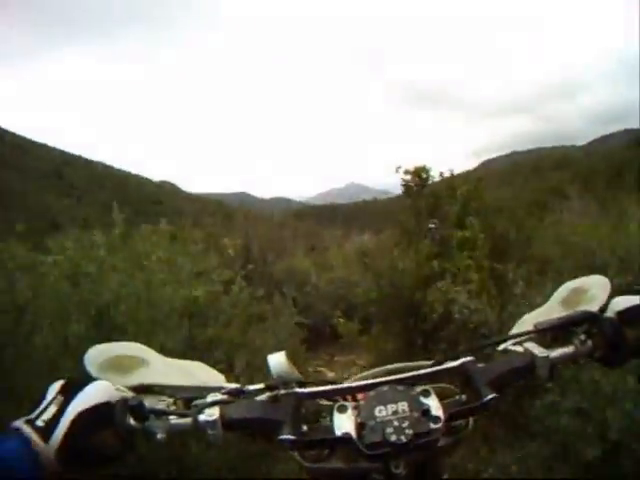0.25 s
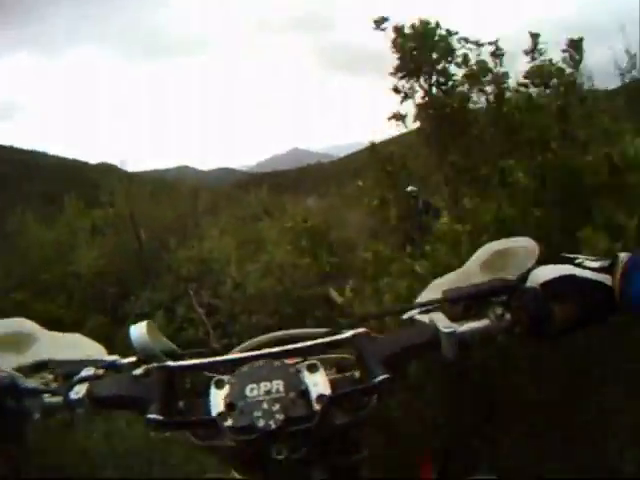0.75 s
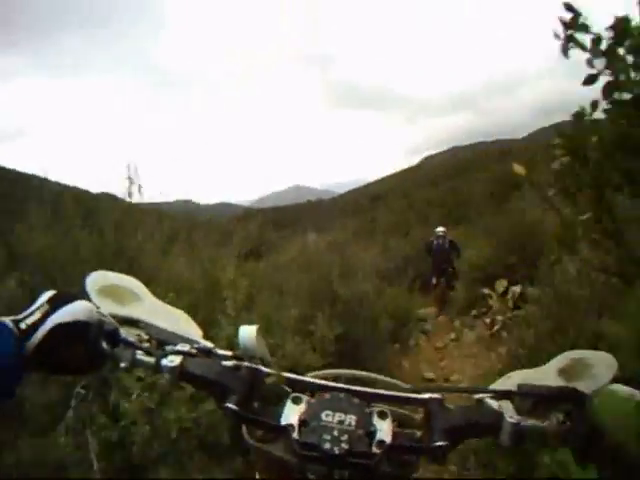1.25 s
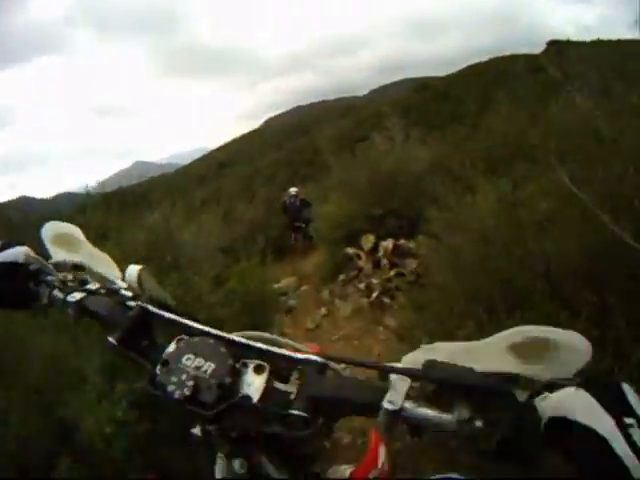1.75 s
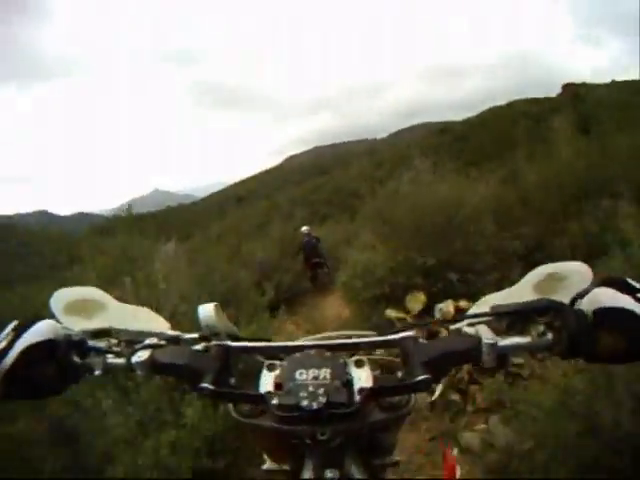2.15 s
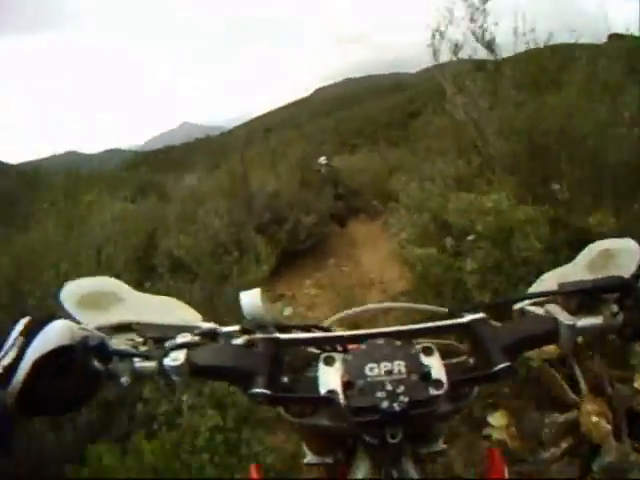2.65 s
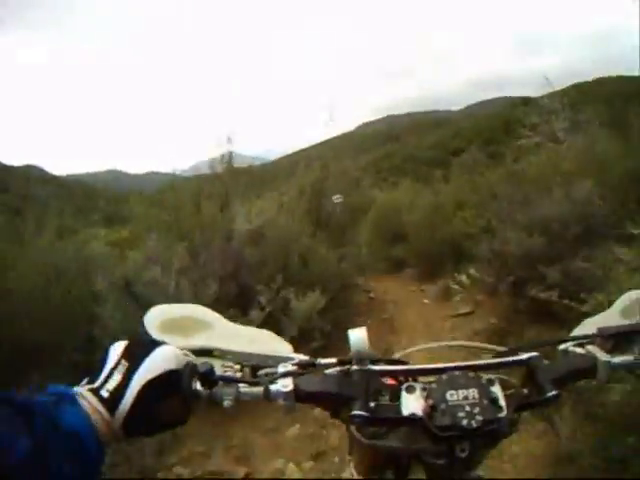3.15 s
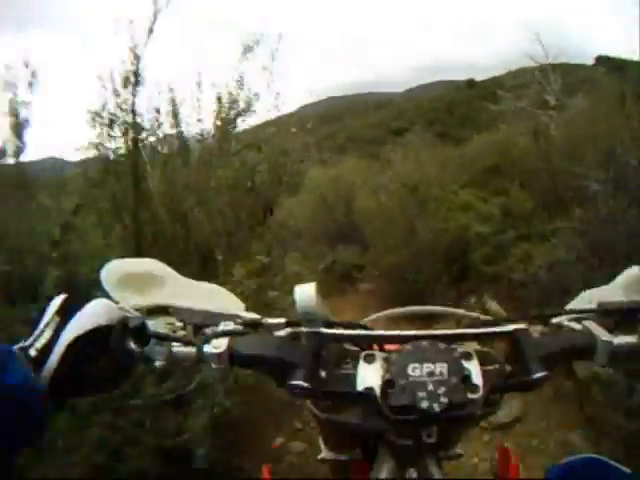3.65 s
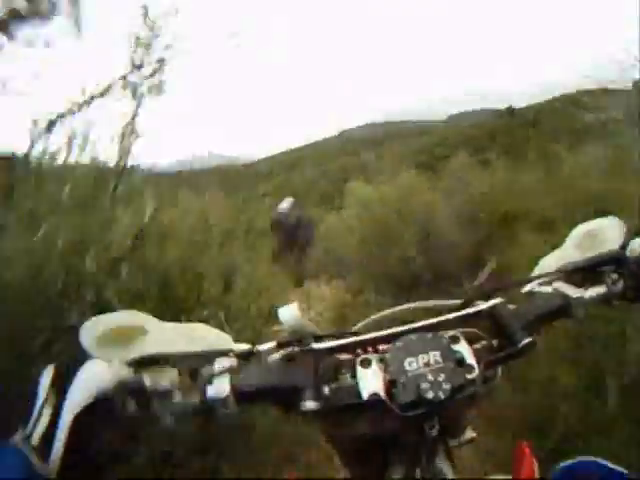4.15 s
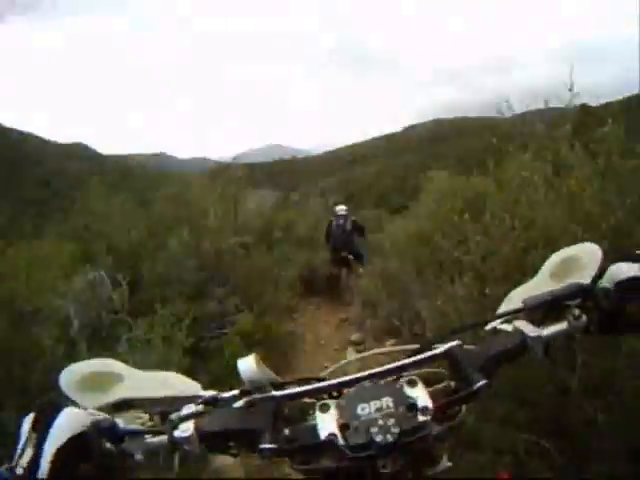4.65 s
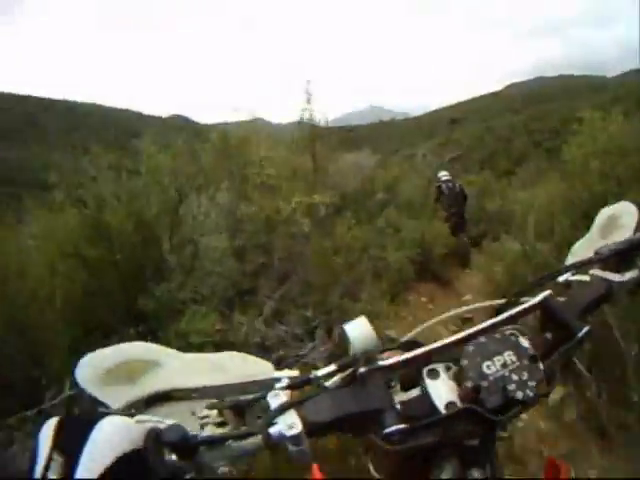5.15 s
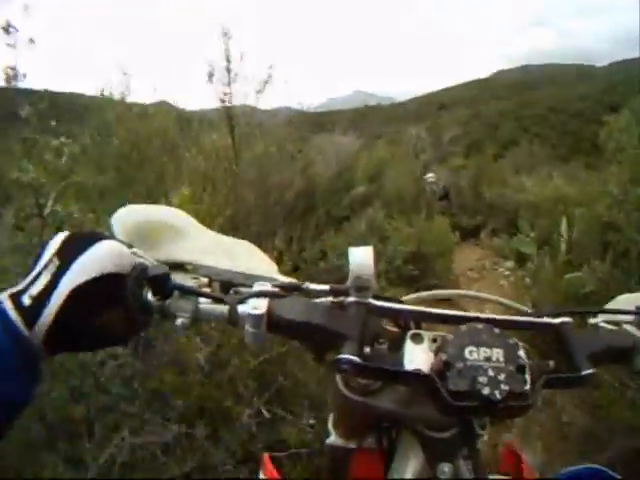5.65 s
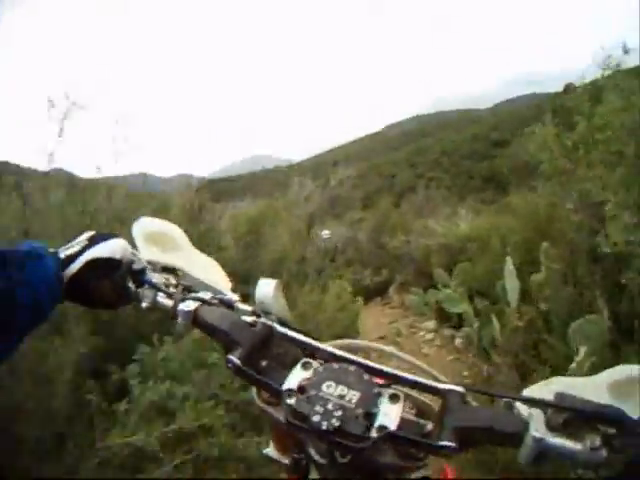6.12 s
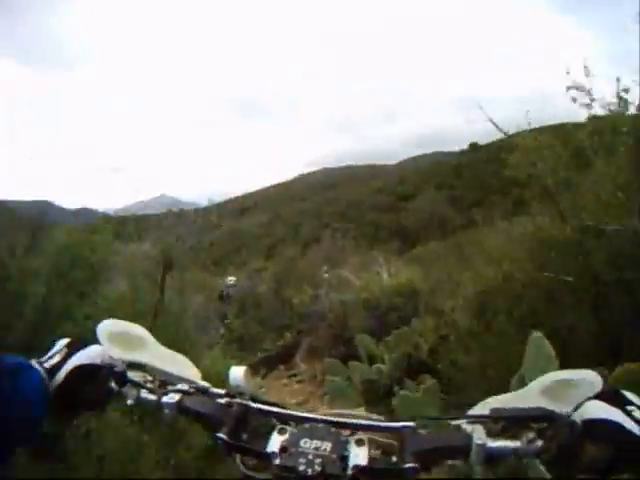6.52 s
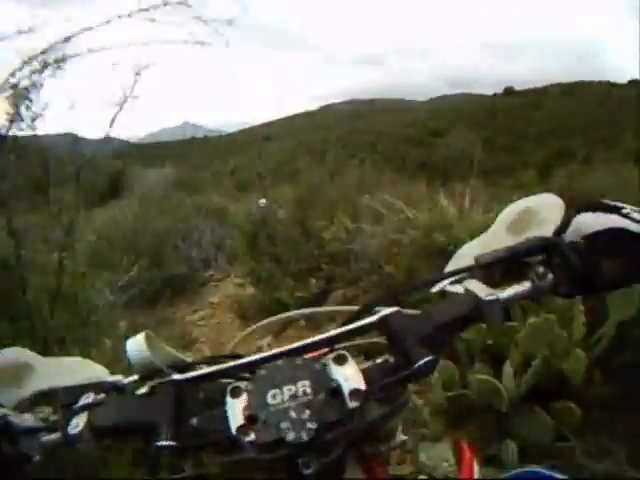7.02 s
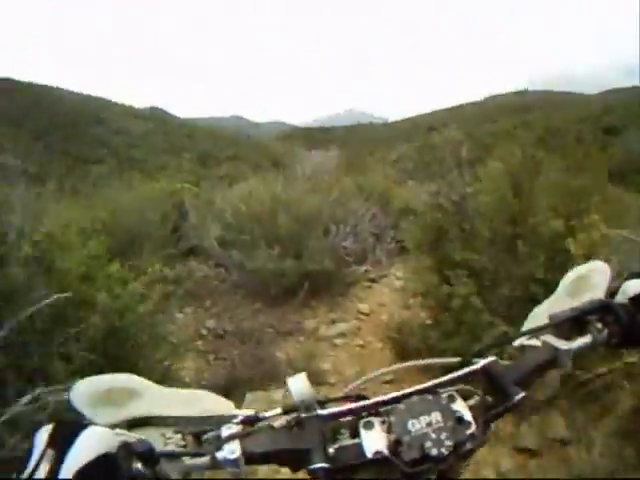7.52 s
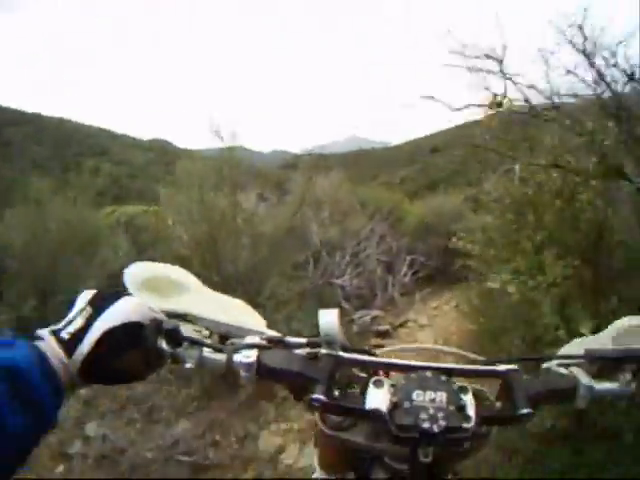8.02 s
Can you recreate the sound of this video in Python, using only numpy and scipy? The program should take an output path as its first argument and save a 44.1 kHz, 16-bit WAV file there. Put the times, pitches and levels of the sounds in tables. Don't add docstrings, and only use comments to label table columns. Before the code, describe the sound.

A trail bike's single-cylinder engine putters and revs low over rocks, muffled and hissy, with violent mount thumps, gear clatter, crackles and brief dropouts.

```python
import sys
import numpy as np
from scipy import signal
from scipy.io import wavfile
from scipy.ndimage import uniform_filter1d

SR = 44100
rng = np.random.default_rng(int(sys.argv[2]) if len(sys.argv) > 2 else 0)


def dump(signal):
    limited = np.clip(np.atleast_2d(signal).T, -1, 1)
    pcm = np.round(limited * 32767).astype(np.int16)
    wavfile.write(sys.argv[1], SR, pcm)


def voltage_ratio(decibels):
    exponent = np.asarray(decibels, float) / 20
    return 10 ** exponent


N = 365148

# start_s, heave_db, strap_hum_db, half_length_s
ROCKS = [(-0, -12, -23.5, 0.096), (0.427, -12.5, -21, 0.095), (0.64, -15.5, -42, 0.24),
         (0.94, -19, -25.5, 0.065), (1.149, -6, -12.5, .09), (1.318, -15.5, -17, 0.16),
         (1.64, -20, -25.5, 0.058), (1.948, -20.5, -34, 0.097), (2.24, -16, -24, 0.17),
         (2.746, -18.5, -29.5, 0.13), (3.055, -10, -26, 0.14), (3.336, -6, -25, 0.041),
         (3.61, -10.5, -24.5, 0.11), (3.978, -27.5, -13, 0.084), (4.076, -4.5, -13.5, 0.092),
         (4.617, -22, -37.5, 0.061), (4.996, -18.5, -39.5, .09), (5.93, -26.5, -69, 0.24),
         (6.5, -19, -24, 0.1), (6.72, -18.5, -49, 0.092), (7.225, -25, -30.5, 0.17),
         (7.76, -22, -36, 0.087), (7.965, -4.5, -23, 0.14), (8.242, -36.5, -20, 0.12)]
# start_s, peak_db, first_pitch_hz
THUMPS = [(.273, -8, 132), (0.322, -13.5, 110), (.474, -7, 91), (.692, -3, 127), (0.895, -10, 143),
          (1.149, -11, 105), (1.37, -11.5, 96), (1.426, -13.5, 113), (1.634, -18, 114), (2.098, -11, 129),
          (2.18, -12.5, 137), (2.297, -3, 113), (2.837, -8.5, 131), (3.138, -8.5, 116), (3.373, -14, 110),
          (3.637, -16, 99), (3.768, -16, 124), (3.887, -5.5, 120), (4.005, 8.5, 90.7), (4.029, 4.5, 133.4),
          (4.072, 9.5, 84), (4.402, -19, 113), (5.616, -2.5, 119.5), (5.8924, -7.5, 149.9),
          (5.8985, -5.5, 151.4), (7.227, -19, 126), (7.814, -3.5, 110), (7.842, -6, 140),
          (8.186, -15.5, 160), (8.23, -17.5, 125)]
# start_s, held_ms, travel_ms
PINNED_BACK = [(0.7781, 16.2, 5.8), (1.058, 22.8, 1.2), (1.1102, 4.75, 0.72), (1.2586, 11.8, 5),
               (2.256, 12.8, 14), (2.3937, 20.3, 8), (2.4763, 17.2, 7.2), (2.6163, 11.6, 6.7),
               (2.9912, 16.6, 6.1), (3.0743, 10.5, 7.2), (3.963, 17, 1.2), (4.0037, 5.4, 2.7),
               (4.0142, 5.6, 0.2), (4.0386, 4.5, 3.4), (4.0911, 16, 2.2), (6.4913, 9.4, 6.7),
               (6.674, 21.3, 4.9), (7.1691, 16.7, 6.2), (7.734, 14.1, 8.5), (7.976, 5.9, 11),
               (8.0091, 17.2, 2.3), (8.053, 14, 3.9), (8.2034, 4.4, 12)]
# start_s, held_ms, travel_ms
PINNED_FRONT = [(0.7997, 15.8, 6.3), (1.093, 15.2, 0.44), (1.1246, 17.6, 0.25), (1.2742, 10.7, 8.1),
                (2.2798, 2.44, 2.05), (2.2845, 6.4, 1.1), (2.294, 5.8, 2.6), (2.428, 6.3, 3.7),
                (2.4582, 11.2, 7.4), (2.5005, 6.5, 7.6), (2.5985, 3.5, 11), (3.0167, 14, 11),
                (3.1097, 2.5, 10), (3.9805, 15.4, 1.97), (4.0436, 14, .7), (4.0863, 1.9, 2.45),
                (6.4745, 6.5, 8.7), (6.6972, 18.5, 3), (7.1912, 9.8, 4.9), (7.757, 9.9, 8.5),
                (7.988, 15.3, 3.2), (8.0307, 14.6, 4.1)]
# start_s,
# peak_db, length_ms
BRIGHT_TICKS = [(.0941, 11.5, 4.84), (.5395, -8, 2.9), (.608, -18.5, 37), (.6965, -3, 1.5), (1.0067, -17.5, 23),
                (1.0475, 15, 10), (1.0799, 10.5, 5.9), (1.1103, -4, 8.3), (1.1932, -19, 11), (1.2291, 12, 7.4),
                (1.3475, 5, 6.1), (2.2069, -6, 3), (2.6606, -16.5, 17), (2.9497, -14, 12), (3.5498, 10, 5.2),
                (3.5897, -8, 9.8), (3.7, -13, 3.4), (3.7534, -10, 30), (3.7915, 1.5, 4.3), (3.8777, -7, 14),
                (4.0654, -10.5, 4.7), (4.112, 0, 5.1), (4.2338, -19.5, 15), (5.1588, -19.5, 9.6),
                (5.8102, -19, 8.9), (5.911, 6.5, 1.2), (6.697, 7, 3.7), (7.0538, -16, 6.7), (7.9844, 1, 9),
                (8.1307, -11.5, 5)]
# start_s, peak_db, length_ms
HARD_GEAR = [(.0541, -13.5, 9.8), (.276, -14, 20), (.373, -6.5, 5.8), (.4225, -16, 3), (.4769, 1.5, 3),
             (1.0711, 7, 6), (1.1596, -10.5, 5.7), (1.2136, -7.5, 36), (1.3074, 4.5, 3.9),
             (2.2365, -9, 3.5), (3.1396, -7.5, 6.6), (3.3718, -8, 2), (3.7738, -2, 4.9), (3.9412, 0, 9.8),
             (3.9463, 11.5, 16.3), (4.0206, -4, 33), (4.0552, -2.5, 12.6), (4.132, -2.5, 3.5),
             (4.4052, -19, 21), (4.8238, -20.5, 4.5), (5.6206, -1.5, 2), (5.7085, -16.5, 6.5),
             (5.9005, 0.5, 1.47), (6.58, -13.5, 5.6), (6.7925, -18, 5.4), (7.1385, -3.5, 15),
             (7.7887, -21.5, 15), (7.9192, -10, 10), (8.0798, -16, 7.7), (8.1923, 1.5, 3)]
# start_s, peak_db, length_ms
PADDED_GEAR = [(.326, -12.5, 2.6), (.6943, -8, 2.3), (.9323, -22, 7.9), (1.1174, -15, 8.5),
               (1.141, -12, 6.4), (1.3753, -7.5, 4.1), (2.1524, -19.5, 8.9), (2.2752, -3.5, 2.27),
               (2.3406, -25, 8.6), (2.422, -32, 30), (2.7878, -24.5, 6), (2.8439, -16.5, 2.8),
               (3.0307, -26.5, 7.5), (3.1907, -20, 8.2), (3.401, -18, 9.3), (3.8531, -19, 3.4),
               (3.9944, 3, 8.7), (4.0739, -13, 4.1), (4.164, -26.5, 10), (4.2088, -11, 3.4),
               (4.5165, -27.5, 24), (4.9647, -30, 5.4), (5.7287, -15.5, 3.6), (5.888, -18.5, 4),
               (7.2029, -18, 8.8), (7.6277, -22, 4.2), (7.8235, -9, 4.1), (7.9374, -14, 5.9),
               (8.102, -25, 13), (8.225, -25.5, 11)]
# pitch_hz, width_hz, level_db
HOLLOW_RINGS = [(588.2, 61, 3), (755, 96, -7), (1138, 71, -5.5), (1288, 110, -11), (1522, 80, -5),
                (945, 296, -14.5)]
# pitch_hz, width_hz, level_db
BRIGHT_RINGS = [(1700, 115, -4), (2188, 250, -0.5), (2462, 160, 2.5), (2720, 190, -10.5), (3370, 510, -6.5),
                (2060, 3500, -15.5)]
# pitch_hz, width_hz, level_db
SILENCER = [(110, 41, 14), (229, 77, -12), (332, 150, -7.5)]
# pitch_hz, width_hz, level_db
PANEL = [(1135, 40, 1), (1270, 60, -6)]
# start_s, level_db, pipe_note_hz
THROTTLE = [(0, -39, 300), (.9, -47.5, 276), (1.4, -38, 272), (1.58, -37.5, 300), (1.8, -35, 312),
            (1.95, -34.5, 288), (2.12, -36.5, 260), (2.4, -46.5, 269), (2.75, -42, 274), (3.6, -43, 270),
            (4.1, -38, 276), (4.5, -45, 277), (6.3, -44.5, 279.7), (6.65, -44.5, 302), (6.9, -47, 283),
            (7.7, -43, 273), (8.28, -37.5, 284)]
# start_s, firings_per_s
SPEED = [(0, 18.28), (.6, 20.15), (1.2, 27.55), (2.0, 23.7), (2.2, 19.28), (2.6, 12.93), (3.0, 15.95),
         (3.4, 15.5), (3.8, 18.15), (4.2, 15.5), (4.4, 13.93), (5.2, 14.25), (5.8, 13.48), (6.2, 14.77),
         (6.8, 14.22), (7.4, 15.48), (7.8, 13.58)]

STOP = 0.96
STEADY_RATE = 15


def rms_one(x):
    return x / np.sqrt(np.mean(x ** 2) + 1e-20)


def band(x, low_hz, high_hz):
    return signal.sosfilt(signal.butter(2, [low_hz, high_hz], "band", fs=SR, output="sos"), x)


def drift(rate):
    r = np.exp(-80 * np.pi * rate / SR)
    slow = signal.lfilter([1], [1, -2 * r, r * r], rng.standard_normal(N // 40 + 2002))
    slow = rms_one(slow[2000:])
    return np.interp(np.arange(N) / 40, np.arange(len(slow)), slow)


def resonate(x, modes, flutter_db=0):
    out = 0
    for k, (hz, width_hz, level_db) in enumerate(modes):
        r = np.exp(-np.pi * width_hz / SR)
        a = [1, -2 * r * np.cos(2 * np.pi * hz / SR), r * r]
        fed = x * voltage_ratio(level_db + flutter_db * drift(38.0)) + 1e-18
        ring = signal.lfilter([(1 - r * r) / 2, 0, (r * r - 1) / 2], a, fed)
        out = out + (-1) ** k * ring
    return out


def ground():
    t = np.arange(N // 40 + 2) * 40 / SR
    s, heave_db, hum_db, half_s = np.transpose(ROCKS)[:, :, None]
    bell = np.exp(-((t - s) / np.maximum(half_s, .02)) ** 2)
    heave = voltage_ratio(-28.5) + np.sum(voltage_ratio(heave_db) * bell, axis=0)
    hum = voltage_ratio(-36.5) + np.sum(voltage_ratio(hum_db) * bell, axis=0)
    return [np.interp(np.arange(N) / SR, t, 20 * np.log10(v)) for v in (heave, hum)]


def shake(heave_db, hum_db):
    heave = band(band(rng.standard_normal(N), 12, 40), 12, 58) * voltage_ratio(3.4 * drift(5.6))
    heave = voltage_ratio(heave_db + 8) * rms_one(heave)
    heave = .7 * np.tanh(heave / .7)
    hum = band(band(rng.standard_normal(N), 62, 170), 55, 200) * voltage_ratio(3.5 * drift(14))
    return heave + voltage_ratio(hum_db + 2.5) * rms_one(hum)


def thumps():
    mount_hz, jolt_share = 113, .4
    jolt_t60_s, mount_t60_s = 0.087, 0.23
    out, knock, t = np.zeros(N + SR), np.zeros(N + SR), np.arange(SR // 2) / SR
    fade = jolt_share * voltage_ratio(-60 * t / jolt_t60_s) + (1 - jolt_share) * voltage_ratio(-60 * t / mount_t60_s)
    shape = fade * (1 - np.exp(-t / 0.0015))
    for s, peak_db, hz in THUMPS:
        pitch_hz = mount_hz + 0.99 * (hz - mount_hz + 12) * np.exp(-t / .03)
        swing = shape * np.sin(2 * np.pi * np.cumsum(pitch_hz) / SR)
        i = round(s * SR)
        out[i:i + len(t)] -= voltage_ratio(min(peak_db, -2) + 5.5) * swing
        knock[i:i + len(t)] += voltage_ratio(peak_db - 9.5) * np.exp(-t / .012)
    return out[:N] + knock[:N] * rms_one(band(rng.standard_normal(N), 190, 500))


def jolts():
    return_share = 0.99
    travel, pressed, t = np.zeros(N), np.zeros(N), np.arange(N) / SR
    for rows, side in [(PINNED_BACK, -1), (PINNED_FRONT, 1)]:
        for s, held_ms, travel_ms in rows:
            end = s + held_ms / 1000
            near = slice(round((s - .02) * SR), round((end + .02) * SR))
            corners = [s - travel_ms / 1000, s, end, end + return_share * travel_ms / 1000]
            travel[near] += side * np.interp(t[near], corners, [0, 1, 1, 0])
            pressed[round(s * SR):round(end * SR)] = side
    return travel, pressed


def strikes():
    bright, hollow, t = np.zeros(N + SR), np.zeros(N + SR), np.arange(SR // 10) / SR
    for rows, hollow_db in [(BRIGHT_TICKS, -22), (HARD_GEAR, -10), (PADDED_GEAR, -2.5)]:
        for s, peak_db, ms in rows:
            contacts = rng.standard_normal(len(t)) ** 3
            fade = np.exp(-(1000 * t / max(ms, 1)) ** 2) + 0.153 * np.exp(-t / 0.011)
            shape = (1 - np.exp(-t / 0.00041)) * fade
            burst = shape * contacts
            burst = burst * np.sqrt(np.sum(shape ** 2) / np.sum(burst ** 2))
            i = round(s * SR)
            bright[i:i + len(t)] += voltage_ratio(peak_db) * burst
            hollow[i:i + len(t)] += voltage_ratio(peak_db + hollow_db) * burst
    return voltage_ratio(3) * resonate(bright[:N], BRIGHT_RINGS) + voltage_ratio(21) * resonate(hollow[:N], HOLLOW_RINGS)


def firing_rate():
    s, rate = np.transpose(SPEED)
    row = np.searchsorted(s, np.arange(N) / SR, side="right") - 1
    return uniform_filter1d(rate[row], size=4410)


def hiss_level(hum_db):
    s, pop_db, _ = np.transpose(THROTTLE)
    load_db = np.interp(np.arange(N) / SR, s, pop_db) - pop_db.mean()
    valves_db = -40 + 0.51 * load_db + 0.2739 * (firing_rate() - STEADY_RATE)
    chatter_db = -38 + 0.53 * (hum_db + 24.5)
    return 10 * np.log10(voltage_ratio(valves_db) ** 2 + voltage_ratio(chatter_db) ** 2)


def exhaust(count, since, per_s, strength, gate):
    t = np.arange(N) / SR
    s, pop_db, pipe_hz = np.transpose(THROTTLE)
    uneven = np.clip(28 / per_s, 0, 1.1) ** 2
    scatter = 1 + .09 * uneven * rng.standard_normal(800)[count]
    note = np.sin(2 * np.pi * np.interp(t - since, s, pipe_hz) * since * scatter)
    pop = strength * note * np.exp(-since / 0.0057) * (1 - np.exp(-since / 0.0062))
    puff = resonate(gate * rng.standard_normal(N), SILENCER)
    return voltage_ratio(np.interp(t, s, pop_db) + 4) * (rms_one(pop) + uneven * rms_one(puff))


def engine_noise(gate, per_s, hiss_db):
    revs = per_s / 2 - STEADY_RATE
    grain = voltage_ratio(3.9 * np.minimum(rng.exponential(1, N), 5)) * rng.standard_normal(N)
    grain = grain * voltage_ratio(0.66 * drift(38.0))
    early_gate = np.roll(gate, -250)
    valves = resonate(grain * (1 + 1.3 * early_gate), BRIGHT_RINGS, flutter_db=1.5)
    hollow = resonate(grain * (1 + 1.3 * gate), HOLLOW_RINGS, flutter_db=1.8)
    hollow = band(hollow, 320, 2400)
    drone = voltage_ratio(-57.5 + 1.07 * revs) * rms_one(resonate(grain, PANEL, flutter_db=4.0))
    ringing = rms_one(valves) + voltage_ratio(1.0 + .15 * revs) * rms_one(hollow)
    return drone + voltage_ratio(hiss_db - 4.0) * ringing


def engine(hiss_db):
    turns = 2 * (.19 + np.cumsum(firing_rate()) / SR)
    per_s = uniform_filter1d(np.gradient(turns) * SR, size=8000)
    count = np.floor(turns).astype(int)
    since = (turns - count) / per_s
    strength = voltage_ratio(np.where(count % 2, -14, 0) + 3.2 * rng.standard_normal(800)[count + 5])
    gate = strength * np.exp(-since / .012) * (1 - np.exp(-since / .003))
    return exhaust(count, since, per_s, strength, gate) + engine_noise(gate, per_s, hiss_db)


def scene():
    heave_db, hum_db = ground()
    travel, pressed = jolts()
    free = 1 - np.clip(uniform_filter1d(np.abs(travel), size=441) * 1.5, 0, 1)
    slow = shake(heave_db, hum_db) + thumps()
    slow = 1.2 * np.tanh(slow / 1.2)
    pinned = STOP * (travel + 0.98 * pressed)
    mix = free * slow + engine(hiss_level(hum_db)) + strikes() + pinned
    return mix[None]


def roll_off(x):
    return signal.sosfilt(signal.butter(12, 16460, fs=SR, output="sos"), x)


def record(dry):
    coupling_s, converter_hz, top_hz = .002, 8000, 15700
    r = np.exp(-1 / (coupling_s * SR))
    stopped = np.clip(dry[0], -STOP, STOP)
    coupled = voltage_ratio(1.02) * signal.lfilter([1, -1], [1, -r], stopped)
    sampled = signal.resample_poly(coupled, converter_hz // 50, SR // 100)[::2]
    sampled = sampled + voltage_ratio(-66) * rng.standard_normal(len(sampled))
    wrapped = np.where(np.abs(sampled) > 1, 0, sampled)
    held = signal.resample_poly(np.repeat(wrapped, 6), 147, 160)[:N]
    held = signal.sosfilt(signal.ellip(12, .5, 45, top_hz, fs=SR, output="sos"), held)
    mix = np.clip(held, -1, 1)[None]
    return roll_off(mix)


dry = scene()
out = record(dry)
dump(out)
```